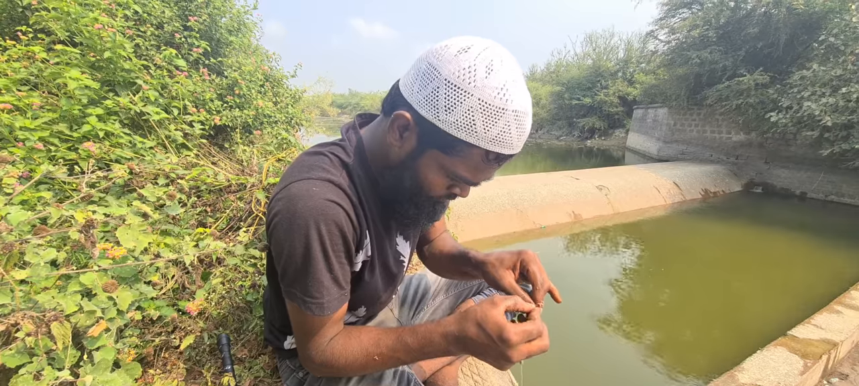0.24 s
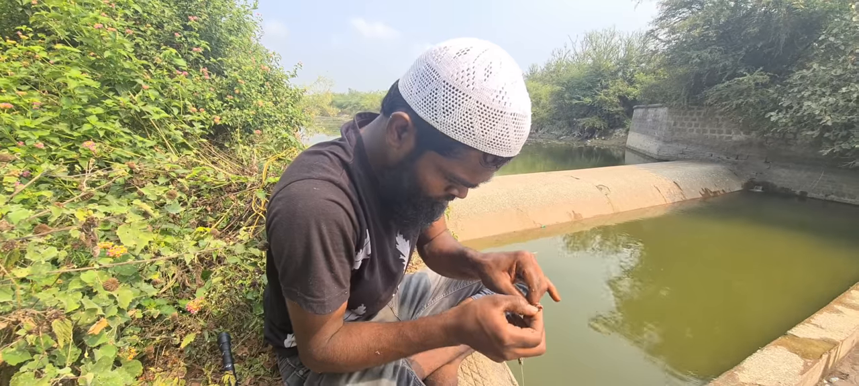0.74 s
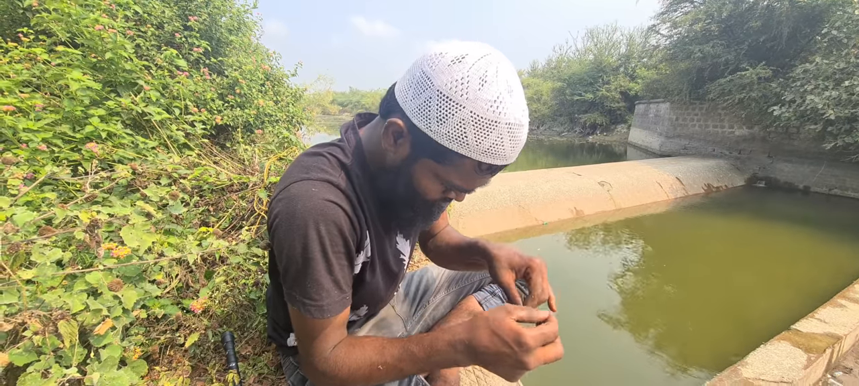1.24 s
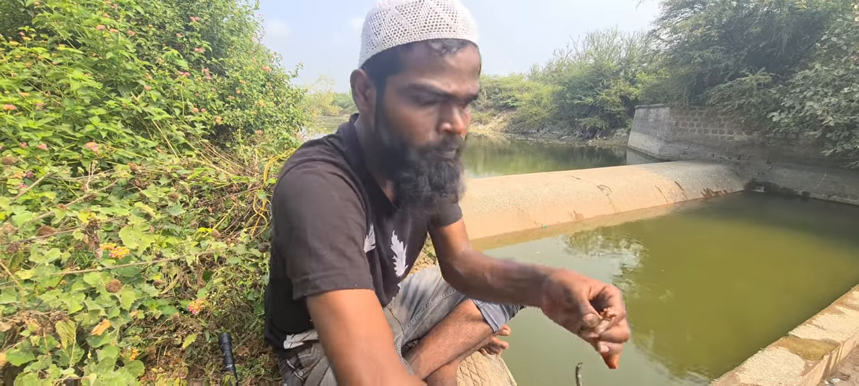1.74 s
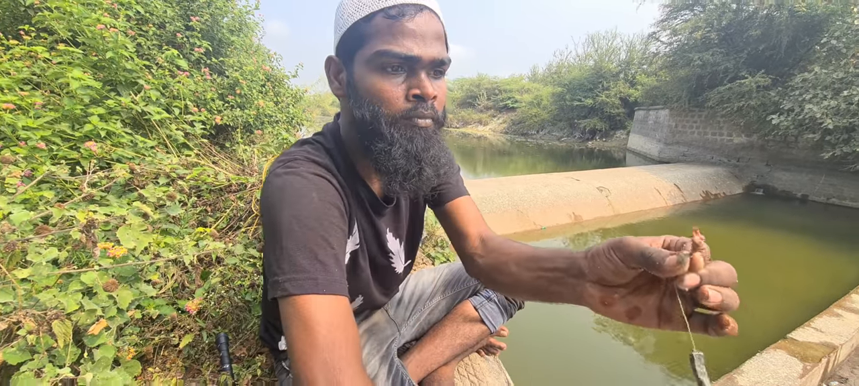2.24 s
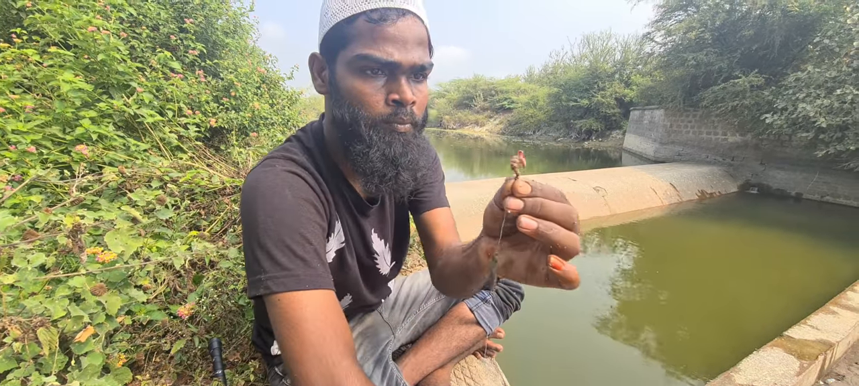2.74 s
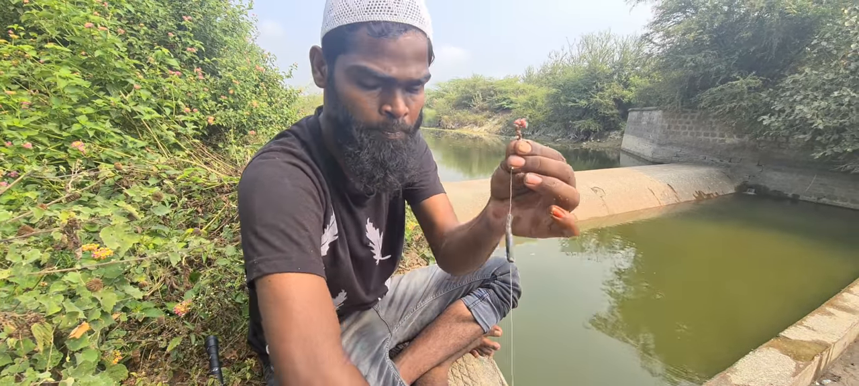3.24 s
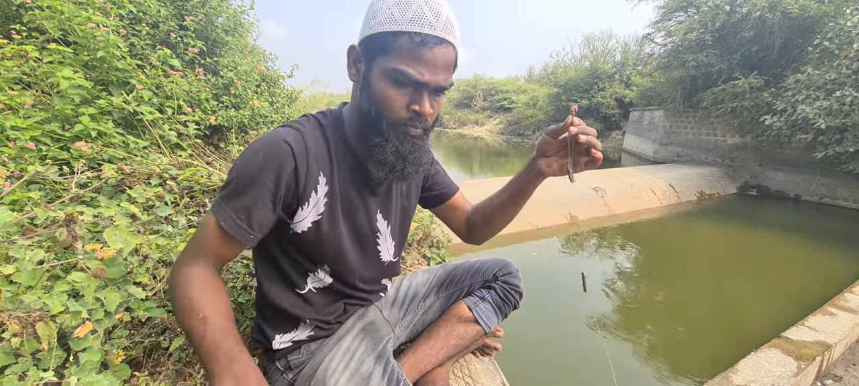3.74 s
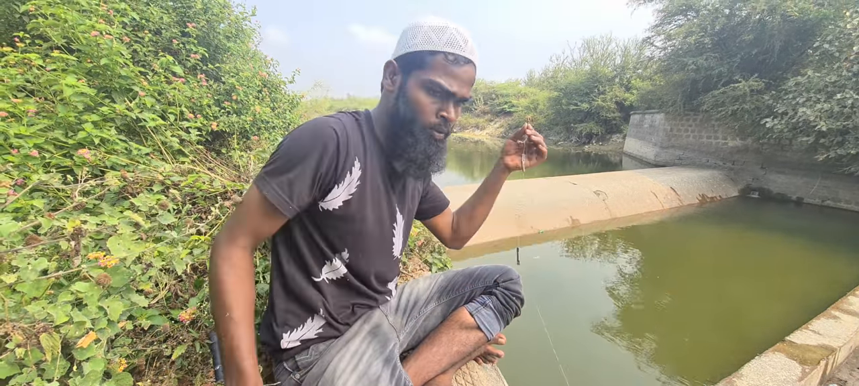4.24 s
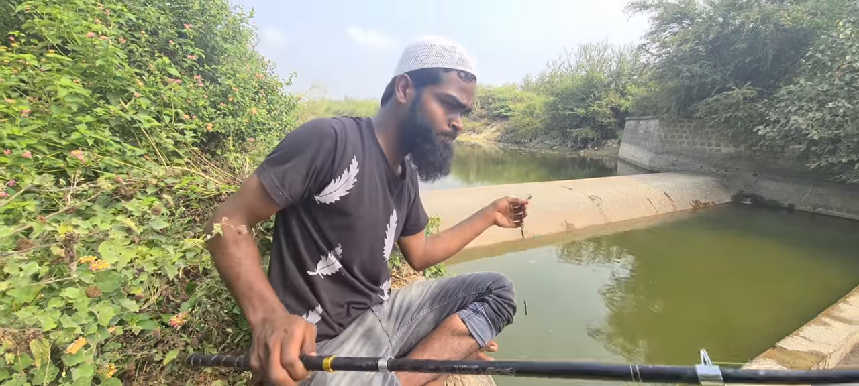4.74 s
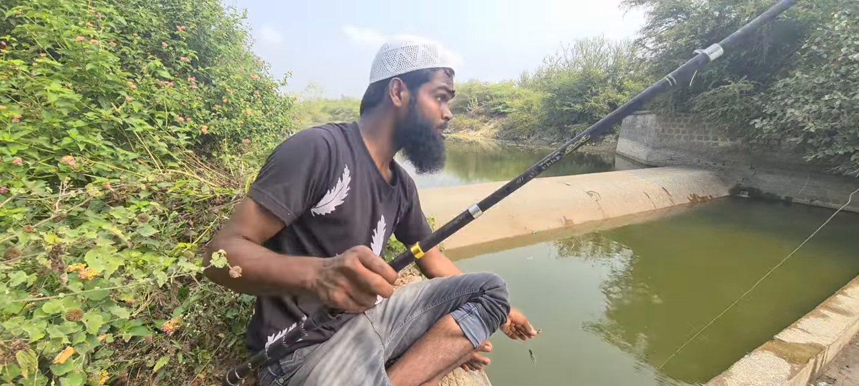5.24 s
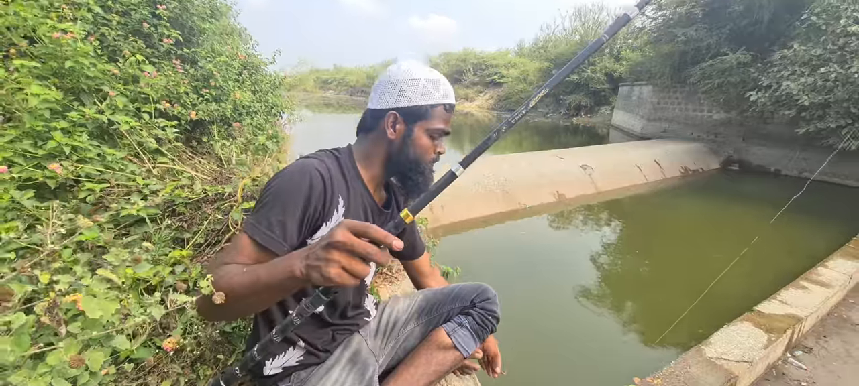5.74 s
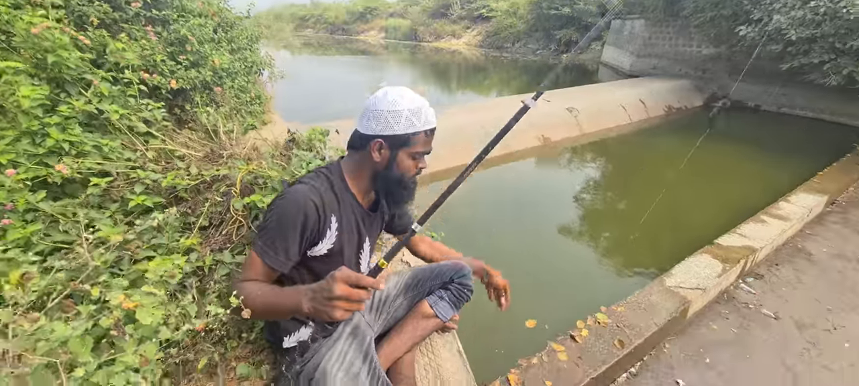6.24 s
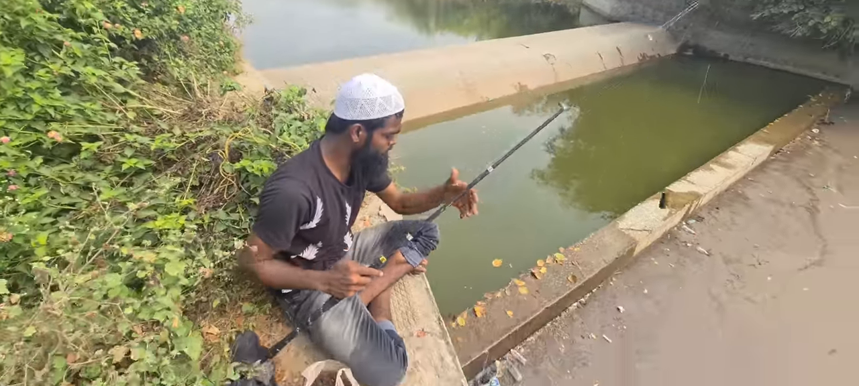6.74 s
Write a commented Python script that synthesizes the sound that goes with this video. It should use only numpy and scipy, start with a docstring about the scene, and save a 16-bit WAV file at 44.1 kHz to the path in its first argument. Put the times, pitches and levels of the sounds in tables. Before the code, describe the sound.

A near bird's quick gliding whistles climb into a high buzzing trill, then farther birds tick, warble and rasp over soft outdoor air.

```python
"""Small birds in canal-side scrub

Over a soft, steady outdoor rush of filtered noise, a near bird whistles quick gliding tones that climb
into a high buzzing trill, made of fast downward pitch sweeps smeared by echoes.
Farther birds tick, warble, rasp and trill through the foliage: most notes are near sines with a slight
waver, some warbled or rasping, all with scattered echoes. Falling whistles come closer together at the end."""
import sys
import numpy as np
from scipy import signal
from scipy.fft import rfft, irfft, next_fast_len
from scipy.io import wavfile
from scipy.ndimage import map_coordinates

SR = 44100
rng = np.random.default_rng(int(sys.argv[2]) if len(sys.argv) > 2 else 0)


def store_wav(level_fs):
    """Save 16-bit WAV to argv[1]."""
    pcm = np.round(np.clip(np.atleast_2d(level_fs), -1, 1) * 32767)
    wavfile.write(sys.argv[1], SR, pcm.T.astype(np.int16))


N = 308259
TIME = np.arange(N) / SR
PROGRESS = np.linspace(0, 1, 64)  # share of a note's length


def from_db(db):
    """Amplitude factor of a level in dB."""
    return 10 ** (np.asarray(db) / 20)


def rms_one(x):
    """Scale a sound to an RMS of one."""
    return x / np.sqrt(np.mean(x ** 2) + 1e-20)


def level_curve(rows):
    """Gain through time from (t/s, level/dB) rows, at -120 dB outside them."""
    s, db = np.transpose(rows)
    return from_db(np.interp(TIME, s, db, left=-120, right=-120))


def coloured(x, points):
    """Filter by a (f/Hz, level/dB) spectrum, joined up along log frequency."""
    hz, db = np.transpose(points)
    size = next_fast_len(N + SR)
    bins = np.maximum(np.fft.rfftfreq(size, 1 / SR), 1)
    gain = from_db(np.interp(np.log(bins), np.log(hz), db))
    return irfft(rfft(x, size) * gain, size)[:N]


def drift(rate, size):
    """Smooth random wander of spread about 1, with a new value rate times a second."""
    steps = np.arange(size) * rate / SR
    return map_coordinates(rng.standard_normal(size // 16 + 8), [steps], order=2, mode="wrap")


def add(out, start, sound):
    """Mix a sound in at a time in seconds."""
    i = max(int(start * SR), 0)
    out[i:i + len(sound)] += sound[:max(N - i, 0)]


def foliage(x, t60, first_s):
    """Leaves, banks and walls scatter sound as many small echoes that build up, then die away; unit power."""
    t = TIME[:SR]
    echoes = rng.standard_normal(SR) * (rng.random(SR) < .1)
    build_up = 1 - np.exp(-(t / first_s) ** 2)
    tail = echoes * from_db(-60 * t / t60) * build_up
    return signal.fftconvolve(x, tail / np.sqrt(np.sum(tail ** 2)))[:N]


def with_echoes(voice, direct_db, echo_db, t60, first_s):
    """Direct sound plus foliage echoes: the balance places a bird near or far from the microphone."""
    return from_db(direct_db) * voice + from_db(echo_db) * foliage(voice, t60, first_s)


def syllable(length, pitches_hz, levels_db, warble_hz=0, warble_rate=82, ragged=0, waver=0.011,
             flutter_db=1.85, edge_s=0.001, overtone_db=-44):
    """One whistle of the syrinx: a wavering near sine on a glide; a fast warble, if any, can turn to a rasp."""
    size = max(int(length * SR), 16)
    u = np.linspace(0, 1, size)

    def along(steps):
        return np.interp(u, np.linspace(0, 1, np.size(steps)), np.atleast_1d(steps))

    glide, db, depth = along(pitches_hz), along(levels_db), along(warble_hz)
    uneven_rate = warble_rate * (1 + 0.12 * drift(37.2, size))
    regular = np.sin(2 * np.pi * np.cumsum(uneven_rate) / SR)
    warble = (1 - ragged) * regular + ragged * drift(4 * warble_rate, size)
    pitch = glide * (1 + waver * drift(298.2, size)) + depth * warble
    phase = 2 * np.pi * np.cumsum(pitch) / SR
    gate = np.sin(np.pi / 2 * np.clip(np.minimum(u, 1 - u) * length / edge_s, 0, 1)) ** 2
    level = from_db(db + flutter_db * drift(187.6, size))
    tone = np.sin(phase) + from_db(overtone_db) * np.sin(2 * phase)
    return np.sqrt(2) * gate * level * tone


def pace(timing, count):
    """Start times of a run of notes whose gap grows or shrinks steadily."""
    first_s, gap_s, change_s = timing
    k = np.arange(count)
    return first_s + gap_s * k + change_s * k ** 2 / 2


def settle(first_hz, last_hz, curve):
    """A glide that starts fast and eases into its last pitch."""
    return last_hz + (first_hz - last_hz) * (1 - PROGRESS) ** curve


def slurs(rows, curve, shape_db, **manner):
    """Settling glides that share one rise and fall of level."""
    out = np.zeros(N)
    for start, length, first_hz, last_hz, db in rows:
        pitch = settle(first_hz, last_hz, curve)
        add(out, start, syllable(length, pitch, db + np.array(shape_db), **manner))
    return out


def arches(rows, leave_curve, shape_db, **manner):
    """Notes that can warble on the way to their turning pitch and leave it cleanly."""
    out = np.zeros(N)
    for start, length, turn, first_hz, turn_hz, last_hz, curve, db, warble_hz in rows:
        turn = np.clip(turn, .05, .95)
        before = np.maximum(1 - PROGRESS / turn, 0)
        after = np.maximum((PROGRESS - turn) / (1 - turn), 0)
        approach = (first_hz - turn_hz) * before ** curve
        leaving = (last_hz - turn_hz) * after ** leave_curve
        depth = warble_hz * np.sin(np.pi * np.sqrt(before))
        pitch = turn_hz + approach + leaving
        add(out, start, syllable(length, pitch, db + np.array(shape_db), depth, **manner))
    return out


def buzz(levels, colour, rate, low_hz, high_hz, uneven, echo_db, throb):
    """The pitch saws down through a wide range many times a second; echoes smear the sweeps into a buzz."""
    cycle = np.cumsum(rate * (1 + uneven * drift(60, N))) / SR % 1
    pitch = (high_hz + (low_hz - high_hz) * cycle) * (1 + .025 * drift(250, N))
    pulse = np.sin(np.pi * cycle) ** throb
    voice = pulse * np.sin(2 * np.pi * np.cumsum(pitch) / SR)
    heard = with_echoes(voice, 0, echo_db, t60=1.0, first_s=0.00073)
    return level_curve(levels) * rms_one(coloured(heard, colour))


def air():
    """Soft rush of the open air: filtered noise, widest in the bass and wider again near 1.4 kHz."""
    # spectrum of the rush: f/Hz, relative level/dB per Hz
    spectrum = [(30, -18), (60, -19.5), (110, -18), (150, -15), (215, -4.5), (290, 0), (480, -1),
                (700, -4.5), (1300, -8), (2500, -15), (5000, -14.5), (9000, -17.5), (12500, -19.5),
                (14500, -33.5)]
    # level through time, ahead of the lift below: t/s, level/dB
    rush_level = [(0, -53.5), (3, -54.5), (6.99, -52.5)]
    # stereo width: f/Hz, side against mid level/dB
    width = [(30, 0), (70, 4), (160, -4), (320, -22), (700, -15), (1400, -4.5), (2500, -18), (5000, -34),
             (12000, -29.5)]
    mid, side = (rms_one(coloured(white, spectrum)) for white in rng.standard_normal((2, N)))
    lift_db = 3
    db = np.interp(TIME, *np.transpose(rush_level)) + lift_db + .5 * drift(12, N)
    left_right = np.array([[1], [-1]])
    return from_db(db) * (mid + coloured(side, width) * left_right)


def chorus(count=1000, note_s=.022):
    """Birds too far off to tell apart: many short chance glides, heard only as echoes."""
    # twittering through time: t/s, level/dB
    twitter_level = [(0, -50.5), (2.7, -59.5), (4.5, -50), (5.0, -48.5), (6.0, -49.5), (6.99, -45)]
    # its colour after the echoes: f/Hz, level/dB
    colour = [(1300, 3), (1700, -12.5), (2500, -5.5), (3400, -0.5), (4200, -5.5), (5200, -8.5),
              (7000, -2.5), (8200, -5), (10000, -17)]
    voices = np.zeros(N)
    for when, height, span, slope in rng.random((count, 4)):
        hz = 1700 * 5 ** height
        bend = 1 + 0.704 * (slope - .5)
        note = syllable(note_s * (.5 + span), [hz * bend, hz, hz / bend], [-6, 0, -6], waver=0.0301)
        add(voices, when * N / SR, note)
    echoes = foliage(voices, t60=0.44, first_s=0.00043)
    return level_curve(twitter_level) * rms_one(coloured(echoes, colour))


def far_trill():
    """A distant buzzing trill: slower, narrower pitch sweeps that swell and fade."""
    # loudness ahead of the small trim below: t/s, level/dB
    swell = [(3.95, -62), (4.304, -47.5), (4.938, -41), (5.378, -42), (5.578, -46), (5.7, -60)]
    # colour of the buzz: f/Hz, level/dB
    colour = [(4500, -26), (5350, -5), (5700, 13), (6100, 4), (6600, 0), (7300, -1.5), (7800, -25),
              (9000, -26)]
    trim_db = -0.5
    return from_db(trim_db) * buzz(swell, colour, rate=62, low_hz=5335, high_hz=7670, uneven=.35,
                                   echo_db=3.5, throb=0.34)


def far_birds():
    """Lower, slightly hoarse warbling, slurs and held notes from the bushes, with long echoes."""
    # notes through a turning pitch, level ahead of shape and mix: start t/s, length t/s,
    # turn [share of length], first f/Hz, turning f/Hz, last f/Hz, approach curve [1 = straight],
    # level/dB, warble depth f/Hz
    arch_notes = [(4.43, 0.22, 0.51, 2224, 3043, 2420, 1.75, -43.5, 198),
                  (5.268, 0.0353, 0.59, 3850, 3050, 3700, 1.47, -37, 200),
                  (5.3, 0.0292, 0.22, 3680, 3870, 2960, 1.7, -32, 101),
                  (5.535, 0.115, .62, 2780, 1728, 2544, 1, -33.5, 60.3),
                  (5.997, 0.065, 0.33, 3515, 3676, 3320, 1.9, -29.5, 60)]
    # settling slides, level ahead of shape and mix: start t/s, length t/s, first f/Hz, last f/Hz, level/dB
    slur_notes = [(4.271, 0.022, 2930, 3410, -31.5), (4.43, 0.024, 3090, 3230, -38),
                  (4.715, 0.021, 1850, 2310, -40), (4.752, 0.043, 2310, 1716, -42),
                  (5.387, 0.024, 3270, 2260, -29.5), (5.445, 0.027, 3070, 2300, -28),
                  (5.733, 0.028, 3950, 3350, -28), (5.944, 0.033, 2964, 2360, -28),
                  (6.228, 0.064, 2790, 2603, -24), (6.288, 0.029, 2500, 2984, -25),
                  (6.705, 0.04, 1410, 1920, -42), (6.83, 0.05, 1975, 1610, -38),
                  (6.888, 0.057, 4830, 4445, -18.5), (6.938, 0.027, 4420, 3270, -25.5),
                  (6.946, 0.023, 2860, 1810, -27)]
    # nearly level notes, the faint one at 0.51 s a lingering echo of the near whistle,
    # level ahead of shape and mix: start t/s, length t/s, middle f/Hz, level/dB
    held_notes = [(0.425, 0.054, 2765, -38.5), (0.51, 0.234, 2690, -55.5), (5.169, 0.04, 3010, -34.5),
                  (5.766, 0.2, 3567, -30.5), (6.56, 0.042, 2742, -23), (6.586, 0.17, 3340, -27.5),
                  (6.759, 0.069, 3640, -28.5)]
    voice = arches(arch_notes, leave_curve=1.645, shape_db=[2, -3, -3, 4.5], warble_rate=94,
                   ragged=0.66, waver=0.016, flutter_db=4.5, edge_s=0.0041)
    voice = voice + slurs(slur_notes, curve=1.92, shape_db=[-3, -2.5, -1, -10], waver=0.021,
                          flutter_db=3.0, edge_s=0.0023, overtone_db=-52)
    for start, length, hz, db in held_notes:
        slight_sink = hz * np.array([1.008, .992])
        shape = db + np.array([1.5, -1.5, 0, -10.5])
        add(voice, start, syllable(length, slight_sink, shape, waver=0.013, flutter_db=2.0,
                                   edge_s=0.0076, overtone_db=-55))
    return with_echoes(voice, -3.5, -7.5, t60=0.77, first_s=0.003)


def rasps():
    """Harsh scolding notes: a wide, ragged warble roughens each glide and echoes blur it."""
    # level ahead of shape and mix: start t/s, length t/s, first f/Hz, last f/Hz, level/dB
    scolds = [(2.9, 0.103, 3950, 3840, -56.5), (4.805, 0.065, 3300, 3150, -42.5),
              (5.06, 0.044, 2425, 3050, -42), (5.122, 0.034, 5600, 4520, -36),
              (5.275, 0.059, 3300, 3090, -42), (5.977, 0.044, 2100, 2152, -36),
              (6.155, 0.0234, 2300, 2030, -40.5), (6.443, 0.075, 4480, 3270, -30.5)]
    voice = slurs(scolds, curve=1.5, shape_db=[0, 0.5, 0.5, -7], warble_hz=340, warble_rate=100,
                  ragged=0.464, waver=0.0674, flutter_db=2, edge_s=0.0021, overtone_db=-38)
    return with_echoes(voice, -4.5, -4, t60=0.94, first_s=0.0025)


def ticks(length=0.0206, lead_s=0.015, lead_db=-14):
    """A far bird's ticks: a short rough falling note with a weaker, higher one just before it."""
    # ticks, level ahead of shape and echoes: t/s, level/dB
    tick_times = [(3.09, -47), (3.182, -42.5), (3.278, -42), (3.375, -38.5), (3.473, -39.5), (3.567, -37.5),
                  (3.661, -33), (3.765, -34), (3.877, -38.5), (3.987, -34), (4.101, -39)]
    # pitch at even steps through a tick: f/Hz
    tick_pitch = [3523, 3205, 2980]
    voice = np.zeros(N)
    for start, db in tick_times:
        add(voice, start, syllable(length, tick_pitch, db + np.array([-19, -1.0, -5, -13]), waver=0.024))
        lead = syllable(length, 1.04 * np.array(tick_pitch), [db + lead_db] * 2, waver=0.034)
        add(voice, start - lead_s, lead)
    close_echoes = from_db(-6.5) * foliage(voice, t60=0.07, first_s=0.0024)
    long_echoes = from_db(-10.5) * foliage(voice, t60=0.85, first_s=0.0086)
    return voice + close_echoes + long_echoes


def falling_whistles(short_s=.05, sag_hz=85, long_end_hz=5690):
    """Four long down-slurs settle on one pitch; four short ones follow closer together, each lower."""
    # long whistles, level ahead of shape and mix: start t/s, length t/s, first f/Hz, level/dB
    long_notes = [(5.883, 0.082, 7630, -46), (6.032, 0.088, 8000, -32), (6.186, 0.088, 8170, -25),
                  (6.359, 0.065, 7650, -22)]
    # swell at even steps through a long whistle: level/dB
    long_shape = [-9.5, -4, 4, -3]
    # pitch at even steps through the first short whistle: f/Hz
    short_pitch = [5840, 5760, 5390, 5006, 4910]
    # level at even steps through a short whistle, ahead of the mix: level/dB
    short_shape = [-23, -22.5, -18.5, -25]
    # short whistles: first t/s, first gap t/s, change of gap per note t/s
    short_pace = (6.487, 0.099, 0.002)
    voice = np.zeros(N)
    manner = dict(waver=0.0082, flutter_db=3.5, edge_s=0.0015, overtone_db=-37.5)
    for start, length, first_hz, db in long_notes:
        pitch = settle(first_hz, long_end_hz, curve=1.8)
        add(voice, start, syllable(length, pitch, db + np.array(long_shape), **manner))
    for k, start in enumerate(pace(short_pace, count=4)):
        pitch = np.array(short_pitch) - k * sag_hz
        add(voice, start, syllable(short_s, pitch, short_shape, **manner))
    return with_echoes(voice, -4.0, -7.5, t60=0.65, first_s=0.0031)


def chips(length=.014, first_db=-38.0, gain_db=0.58):
    """Very quick upward sweeps that speed up and grow into the trill, heard mostly by their echoes."""
    # pitch at even steps through a chip: f/Hz
    chip_pitch = [4664, 6980, 9120]
    # chips: first t/s, first gap t/s, change of gap per note t/s
    chip_pace = (0.058, 0.131, -0.0052)
    voice = np.zeros(N)
    for k, start in enumerate(pace(chip_pace, count=10)):
        shape = first_db + k * gain_db + np.array([-17, 1.5, -1.5, -16.0])
        add(voice, start, syllable(length, chip_pitch, shape))
    close_echoes = from_db(2.0) * foliage(voice, t60=0.28, first_s=0.0031)
    long_echoes = from_db(3.0) * foliage(voice, t60=0.78, first_s=0.012)
    return from_db(-4) * voice + close_echoes + long_echoes


def shiver(start_s=1.076, length=0.37, first_hz=8050, last_hz=7050, settle_s=.04):
    """A note early in the loud trill: it sinks to a steady pitch and fades while its shiver widens."""
    pitch = last_hz + (first_hz - last_hz) * np.exp(-PROGRESS * length / settle_s)
    voice = np.zeros(N)
    note = syllable(length, pitch, levels_db=[-24, -26.5, -30], warble_hz=[200, 520], warble_rate=46,
                    ragged=0.29, waver=0.0205, flutter_db=4.5, overtone_db=-57)
    add(voice, start_s, note)
    return with_echoes(voice, -4.5, -9, t60=0.57, first_s=0.0025)


def trill_beats(first_db=-25.5, gain_db=0.01, flick_lead_s=.027, flick_s=0.027, slash_s=.015,
                flick_db=-12, flick_gain_db=0.8):
    """A flick up and a slash down mark each beat of the slackening loud trill; the flicks grow unevenly."""
    # pitch at even steps through a flick: f/Hz
    flick_pitch = [4482, 6070, 7160]
    # pitch at even steps through a slash: f/Hz
    slash_pitch = [8880, 7690, 6730]
    # beats: first t/s, first gap t/s, change of gap per beat t/s
    beat_pace = (1.262, 0.0625, 0.00076)
    voice = np.zeros(N)
    for k, start in enumerate(pace(beat_pace, count=14)):
        db = first_db + k * gain_db
        flick = db + flick_db + k * flick_gain_db + rng.normal(0, 1.2)
        flick_note = syllable(flick_s, flick_pitch, [flick - 20, flick - 1, flick], waver=0.024)
        add(voice, start - flick_lead_s, flick_note)
        add(voice, start, syllable(slash_s, slash_pitch, [db - 16.5, db, db - 13], waver=0.009))
    return with_echoes(voice, -3.0, -2.5, t60=.45, first_s=0.0029)


def loud_trill(start_s=0.85, attack_s=0.28, stop_s=2.157, release_s=0.27, hold_db=-33):
    """The high buzzing trill: fast, wide pitch sweeps that swell, hold and die away."""
    # colour of the buzz: f/Hz, level/dB
    colour = [(4000, -21), (5250, -39), (5650, -0.5), (6500, 5), (7200, -7), (8350, -10), (8900, -9.5),
              (10000, 7), (12000, 11)]
    corners = [(start_s, hold_db - 12), (start_s + attack_s, hold_db),
               (stop_s, hold_db), (stop_s + release_s, hold_db - 31)]
    return buzz(corners, colour, rate=105, low_hz=5320, high_hz=8900, uneven=.25, echo_db=5, throb=0.35)


def near_bird():
    """Close to the microphone and nearly dry: clean arching whistles with quick slurs between them."""
    # notes through a turning pitch, level ahead of shape, throat and mix: start t/s, length t/s,
    # turn [share of length], first f/Hz, turning f/Hz, last f/Hz, approach curve [1 = straight],
    # level/dB, warble depth f/Hz
    arch_notes = [(0.048, 0.176, 0.99, 2366, 3660, 3800, 1.5, -23, 477),
                  (0.219, 0.1, 0.53, 3940, 4470, 2690, 1.38, -20, 197),
                  (0.522, 0.124, 0.93, 2750, 5190, 3500, 1.75, -18, 70),
                  (0.863, 0.052, .7, 8750, 8950, 8150, 1, -26, 58),
                  (0.927, 0.054, .28, 4180, 8800, 4980, 1.66, -19, 0),
                  (1.038, 0.03, 0.92, 6000, 9200, 6900, 1.5, -21.5, -1.5)]
    # settling slides, level ahead of shape, throat and mix:
    # start t/s, length t/s, first f/Hz, last f/Hz, level/dB
    slur_notes = [(0.431, 0.031, 4950, 2450, -21.5), (0.452, 0.017, 2480, 2400, -27),
                  (0.461, 0.013, 5170, 3200, -23), (0.502, 0.024, 3180, 5410, -26),
                  (0.686, 0.0096, 6840, 3850, -20.5), (0.697, 0.042, 6530, 3470, -17),
                  (0.842, 0.088, 6230, 7100, -27.5)]
    # the throat favours the middle of the bird's range: f/Hz, level/dB
    throat = [(2400, -16.5), (3200, -11.5), (3800, -3.5), (4500, 0), (5300, -2), (7000, -1), (8000, -7.5),
              (9200, -9)]
    waver = .004
    voice = arches(arch_notes, leave_curve=1.5, shape_db=[-4.5, 0.5, 1.5, -2], warble_rate=90,
                   ragged=0.16, waver=waver, flutter_db=2.3, edge_s=0.0024)
    voice = voice + slurs(slur_notes, curve=1.9, shape_db=[-3.5, 2.0, -2, -11], waver=waver,
                          flutter_db=1.6, edge_s=0.0013)
    return with_echoes(coloured(voice, throat), -3.5, -17, t60=0.47, first_s=0.004)


def scene():
    """The birds are heard in the middle; only the air is wide."""
    background = air() + chorus()
    far = far_trill() + far_birds() + rasps() + ticks() + falling_whistles()
    trill = chips() + shiver() + trill_beats() + loud_trill()
    return background + far + trill + near_bird()


def record(dry):
    """A steep low-pass takes off the top of the treble."""
    cutoff_hz = 14600
    low_pass = signal.ellip(10, .1, 80, cutoff_hz, fs=SR, output="sos")
    return signal.sosfilt(low_pass, dry)


dry = scene()
out = record(dry)
store_wav(out)
```